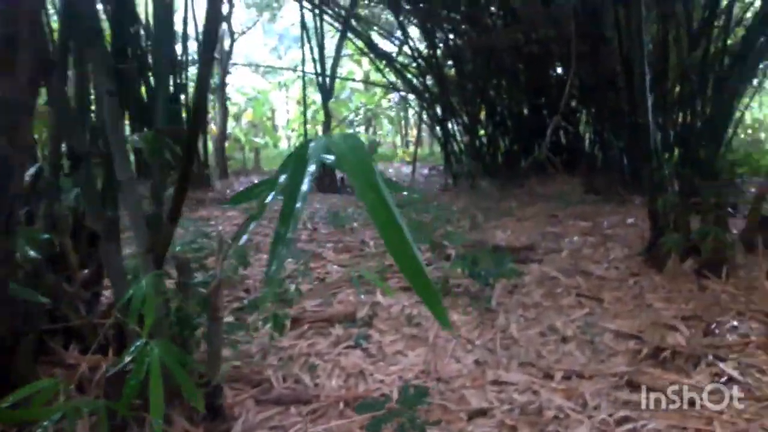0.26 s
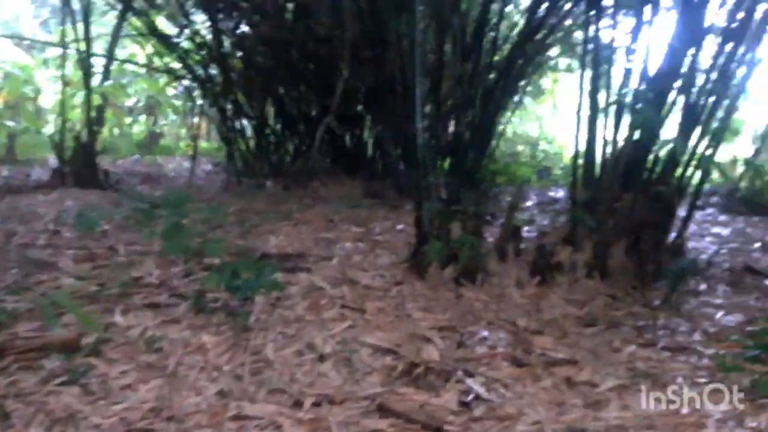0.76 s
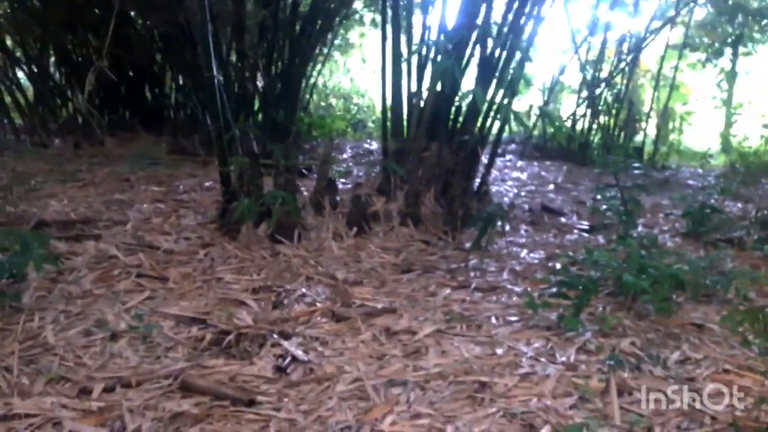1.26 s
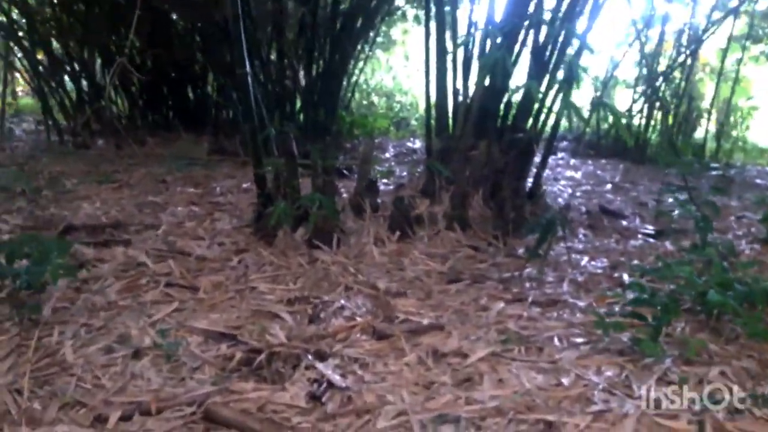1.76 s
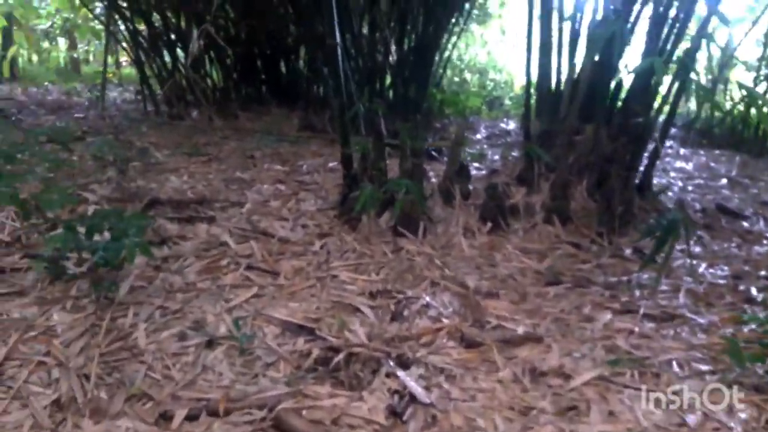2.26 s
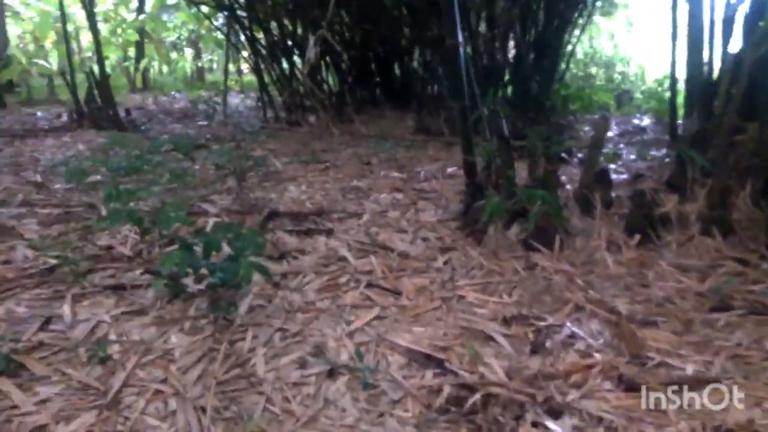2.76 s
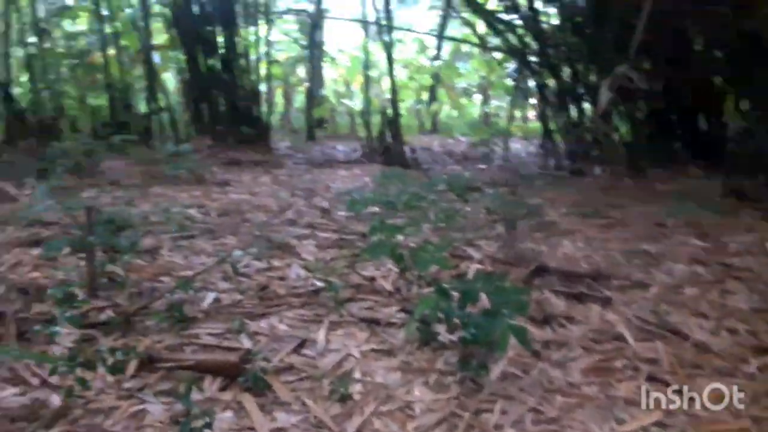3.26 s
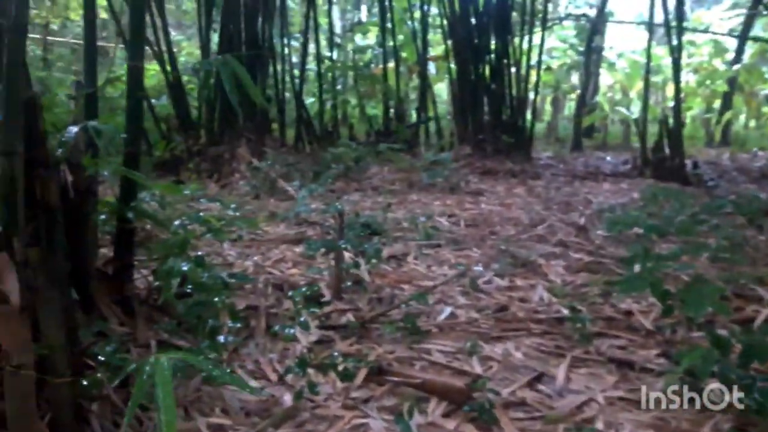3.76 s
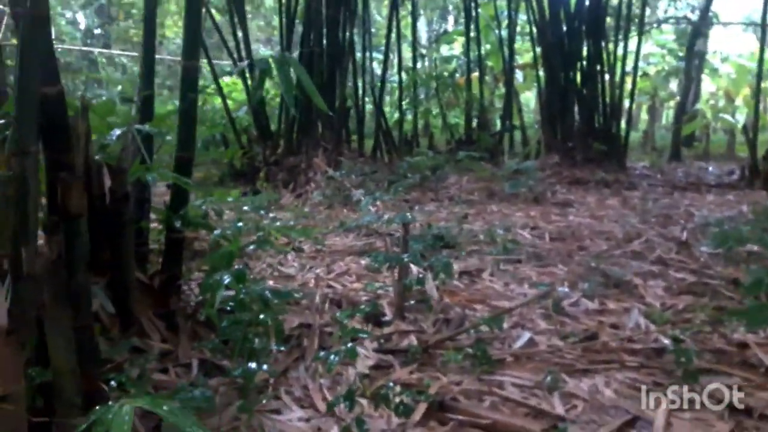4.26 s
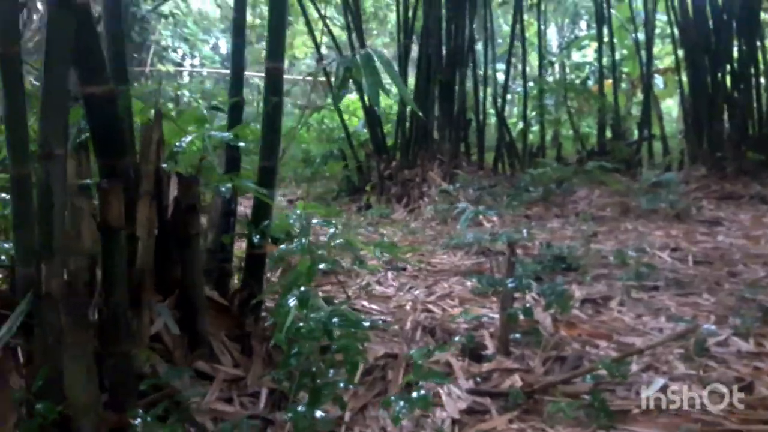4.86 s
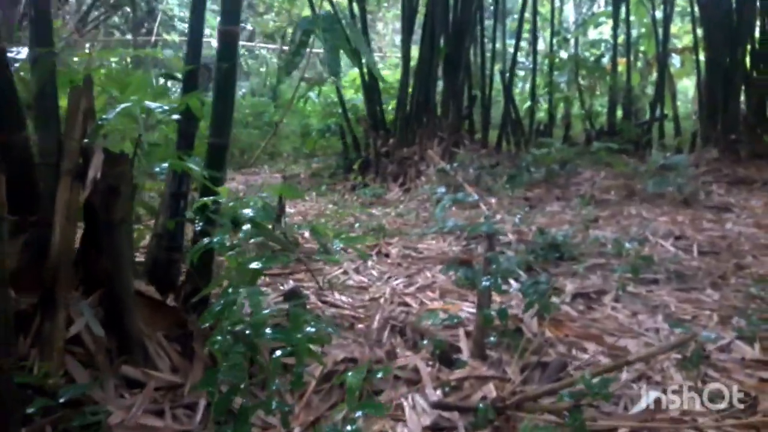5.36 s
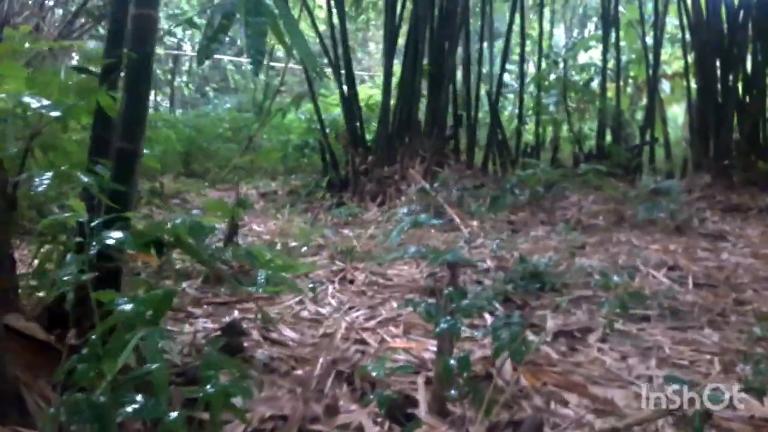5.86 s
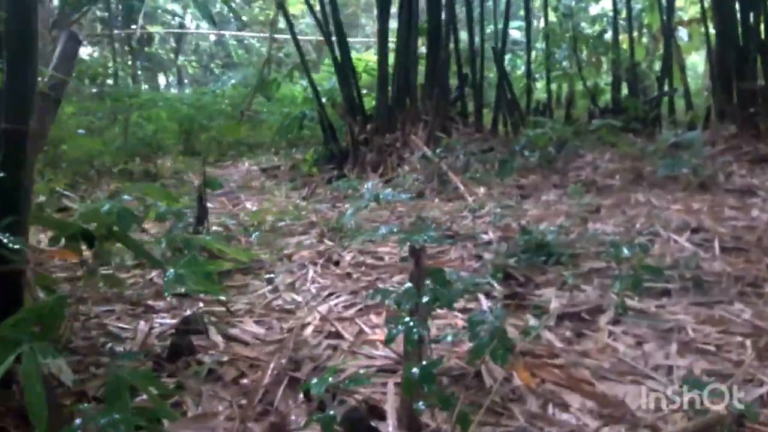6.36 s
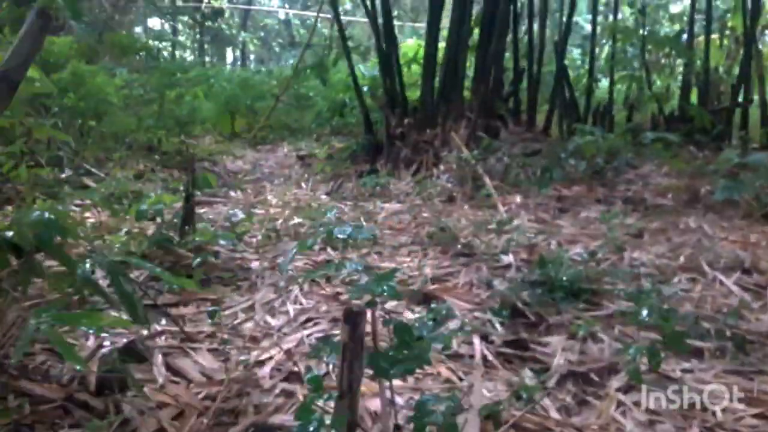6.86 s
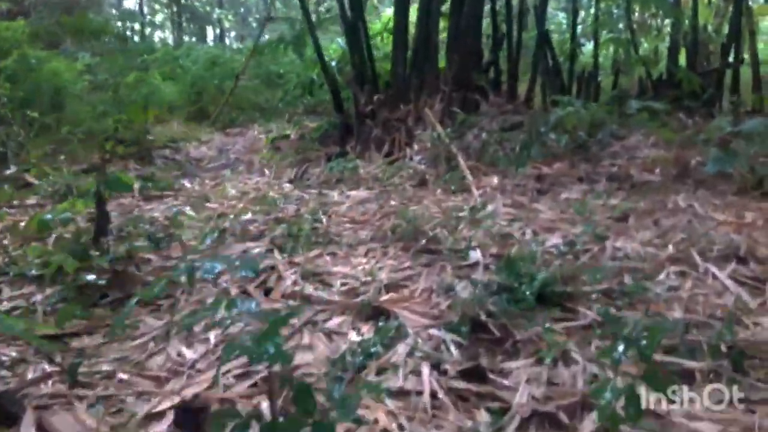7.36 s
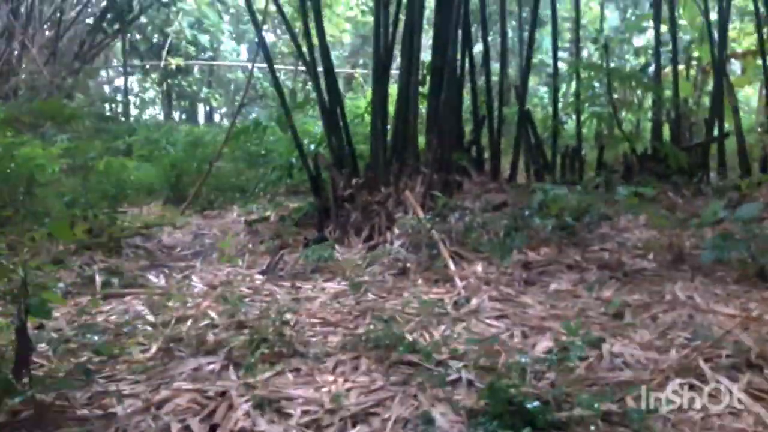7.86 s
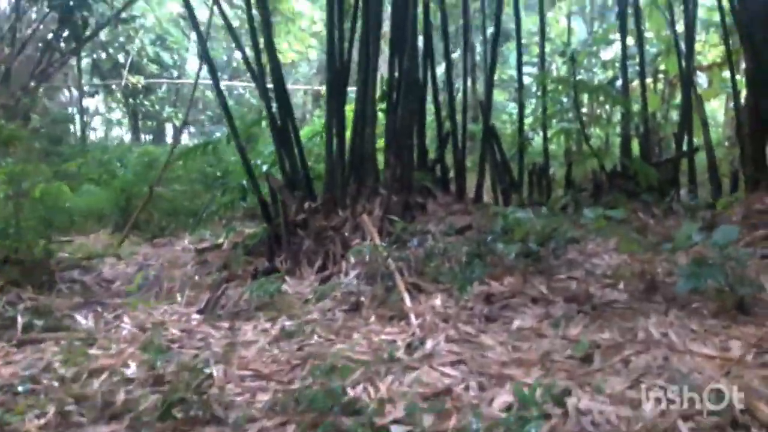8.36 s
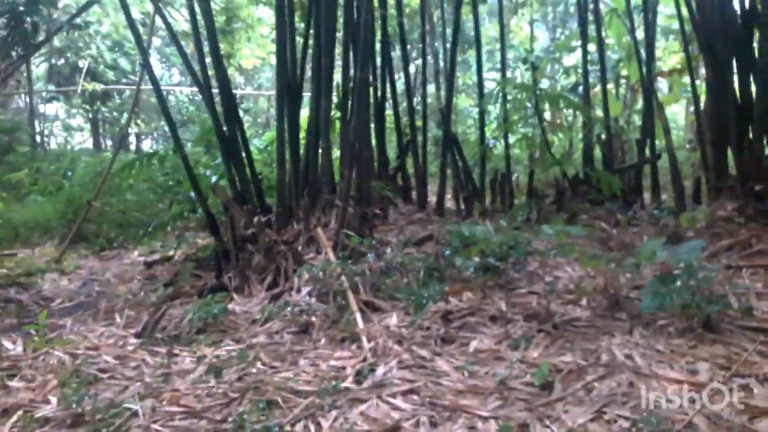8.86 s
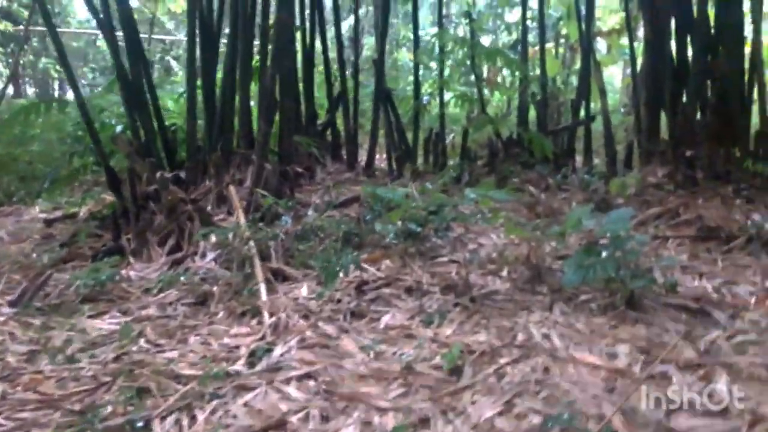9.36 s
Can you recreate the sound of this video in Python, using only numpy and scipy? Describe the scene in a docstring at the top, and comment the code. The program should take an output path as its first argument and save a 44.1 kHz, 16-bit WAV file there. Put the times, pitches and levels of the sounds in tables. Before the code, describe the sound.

Steady rain in a bamboo grove: an even, soft wash of distant drops, faint hollow hums low within it, and fine nearby patter on leaves and dry litter. Bigger canopy drips snap close by at irregular moments. Everything repeats about half a second later at full strength, then ever fainter. One small microphone, centred mono, slightly dull at the very top.

```python
"""A bamboo grove in steady rain, heard by one small microphone.
Far rain is an even wash of smooth noise. Nearer drops patter on leaves and litter as short noisy splashes.
Bigger drips from the canopy splat close by, each a quick burst of noise in its own band.
A half-second delay line repeats everything once at full strength, then ever fainter."""
import sys
import numpy as np
from scipy import signal
from scipy.fft import rfft, irfft
from scipy.io import wavfile

SR = 44100
rng = np.random.default_rng(int(sys.argv[2]) if len(sys.argv) > 2 else 0)


def master_out(mix):
    """Clip the mix to full scale and print it as 16-bit PCM to the path in sys.argv[1]."""
    frames = np.transpose(np.atleast_2d(mix))
    ceiling = np.clip(frames, -1, 1)
    pcm = np.round(ceiling * 32767).astype(np.int16)
    wavfile.write(sys.argv[1], SR, pcm)


N = 423360   # samples heard
DELAY, FEEDBACK = 22056, 0.4   # samples, share sent round again
LEAD = 4 * DELAY   # samples of rain before 0 s, to fill the delay line
LENGTH = N + LEAD


def from_db(db):
    """Turns decibels into a plain multiplier."""
    return 10 ** (np.asarray(db) / 20)


def rms_one(x):
    """Scales a sound to an average (rms) level of 1."""
    return x / np.sqrt(np.mean(x ** 2) + 1e-20)


def colour(x, spectrum):
    """Makes each pitch region louder or softer by a (frequency, level) table; rms 1."""
    hz = np.maximum(np.arange(LENGTH // 2 + 1) * SR / LENGTH, 1)
    table_hz, table_db = np.transpose(spectrum)
    gain_db = np.interp(np.log(hz), np.log(table_hz), table_db)
    return rms_one(irfft(rfft(x) * from_db(gain_db), LENGTH))


def drift(rate_hz):
    """A randomly wandering curve with spread 1: noise smoothed so that little faster than rate_hz is left."""
    r = np.exp(-2 * np.pi * rate_hz / SR)
    return rms_one(signal.lfilter([1], [1, -2 * r, r * r], rng.standard_normal(LENGTH)))


def resonate(x, hz, cycles):
    """A leaf, once struck, rings at hz and fades by 60 dB in so many cycles."""
    r = from_db(-60 * hz / (cycles * SR))
    return signal.lfilter([1, 0, -1], [1, -2 * r * np.cos(2 * np.pi * hz / SR), r * r], x)


HUM_WAVER_DB, HUM_WAVER_HZ = 2.0, 0.92
SHIMMER_ABOVE_HZ, SHIMMER_DB, SHIMMER_RATE_HZ = 7950, 4, 60
# balance of the far rain: (frequency [Hz], level per Hz [dB])
WASH_SPECTRUM = [(25, -38), (45, -31), (110, -18), (200, -10), (290, -4), (550, -1), (850, -3.5),
                 (2200, -7), (3170, -12), (5900, -10.5), (6550, -11.5), (7800, -23), (9800, -29.5),
                 (15500, -26)]
# soft hums in the low wash, probably hollow stems: (frequency [Hz], width [Hz], average lift [dB])
STEM_HUMS = [(131.6, 15, 3), (275, 32, 3.5), (418, 15.4, 4.5), (514, 17, 4), (647, 54, 1.5), (970, 55, 1),
             (1343, 91, 2.5)]


def wash(level_db):
    """Countless far drops merge into smooth noise, lifted a little at each slowly wavering hum."""
    noise = colour(rng.standard_normal(LENGTH), WASH_SPECTRUM)
    hums = 0
    for hz, width_hz, db in STEM_HUMS:
        b, a = signal.iirpeak(hz, hz / width_hz, fs=SR)
        lift = from_db(db + HUM_WAVER_DB * drift(HUM_WAVER_HZ)) - 1   # the part added to the noise
        hums = hums + lift * signal.lfilter(b, a, noise)
    # the finest hiss swells and sinks quickly
    high_pass = signal.butter(2, SHIMMER_ABOVE_HZ, "high", fs=SR, output="sos")
    hiss = signal.sosfilt(high_pass, noise)
    shimmer = (from_db(SHIMMER_DB * drift(SHIMMER_RATE_HZ)) - 1) * hiss
    return from_db(level_db) * (noise + hums + shimmer)


DROPS_PER_S = 600   # before clumping
CLUMPING_DB, CLUMPING_HZ = 4, 15   # how strongly and how fast the crowding of drops varies
SIZE_SPREAD_DB = 3.5
LEAF_CYCLES, SPLASH_MS = 2, 1
SPRAY_SHARE = 0.39   # the rest rings in leaves
# near drops as the microphone colours them: (frequency [Hz], level per Hz [dB])
PATTER_SPECTRUM = [(600, -29), (1300, -12), (2200, 5), (3200, -3.5), (5900, 3), (6600, -1.5), (7800, -8),
                   (9800, -13.5), (15500, -23.5)]


def patter(level_db):
    """Random drops in clumps: each a short splash of noise, partly broad spray, partly ringing in a leaf."""
    chance = DROPS_PER_S * from_db(CLUMPING_DB * drift(CLUMPING_HZ)) / SR
    born = rng.random(LENGTH) < chance
    sizes = born * from_db(SIZE_SPREAD_DB * np.minimum(rng.exponential(1, LENGTH), 2.5))
    fade = np.exp(-1000 / (SPLASH_MS * SR))
    leaves_hz = np.geomspace(1400, 14000, 14)
    leaf_hit = rng.integers(0, 14, LENGTH)
    noise = rng.standard_normal(LENGTH)
    rings, spray = 0, 0
    for k, hz in enumerate(leaves_hz):
        swell = signal.lfilter([1], [1, -fade], sizes * (leaf_hit == k) + 1e-18)
        splash = noise * swell
        ring = resonate(splash, hz, LEAF_CYCLES)
        rings = rings + np.sqrt(hz) * rms_one(ring)   # wider rings carry more power: a flat sum
        spray = spray + splash
    drops = SPRAY_SHARE * rms_one(spray) + (1 - SPRAY_SHARE) * rms_one(rings)
    return from_db(level_db) * colour(drops, PATTER_SPECTRUM)


# limits for the smaller drips: peak [dB], centre [Hz], splash length setting [ms], fine spray [dB]
SMALL_DRIPS_PER_S = 14
SMALL_DB, SMALL_HZ, SMALL_MS, SMALL_SPRAY_DB = (-32, -25), (2700, 6400), (0.87, 3.2), (-61, -38)


def small_drips():
    """Smaller drips fall at random moments over the whole span, with random settings between the limits."""
    span = (-LEAD / SR, N / SR)
    low, high = np.transpose([span, SMALL_DB, SMALL_HZ, SMALL_MS, SMALL_SPRAY_DB])
    count = int(SMALL_DRIPS_PER_S * LENGTH / SR)
    return low + (high - low) * rng.random((count, 5))


# a drip's half-width: octaves at 4 kHz, octaves lost per octave up,
# octaves gained per ms that the length setting exceeds a short tap [ms]
WIDTH_OCT, NARROWING, SPREAD_PER_MS, TAP_MS = 0.24, 0.12, 0.18, 3.3
RISE_MS, TAIL_MS, SPRAY_MS = 0.083, 7.2, 3.6   # time constants
TAIL_DB, SLAP_DB = -10.5, -6.5   # beside the splash, beside the leaf's band
PORT_ROLL_OFF_HZ = 7360
DRIP_SAMPLES, SETTLE = 1024, 256   # kept, and thrown away first while the filters settle
# the loudest drips close by, those before 0 s heard only as repeats:
# (time [s], peak level [dB], centre [Hz], splash length setting [ms], fine spray level [dB])
LOUD_DRIPS = [(-0.2603, -24, 3490, 2.0, -48), (-0.0213, -21, 5100, 1.0, -55),
              (0.2395, -28.5, 3360, 2.3, -57), (0.595, -21.5, 3200, 6.5, -51),
              (0.7021, -21, 4730, 1.0, -48), (0.84, -14.5, 5030, 0.55, -40), (1.1568, -21, 5540, 0.6, -58),
              (1.3849, -19.5, 5500, 2.4, -54), (1.7469, -22, 4340, 2.2, -58), (2.303, -23, 5940, 1.8, -53),
              (2.6196, -22.5, 2730, 1.9, -47), (2.6953, -20.5, 2400, 2.3, -48),
              (2.7485, -22.5, 4230, 2.3, -53), (2.8403, -19.5, 5900, 1.4, -45),
              (2.8617, -33, 5830, 0.9, -36), (2.952, -21, 4260, 1.7, -52), (3.081, -21.5, 5000, 5.1, -41),
              (3.1809, -23, 4840, 1.7, -49), (3.4916, -24.5, 4670, 4.3, -38), (3.6335, -25, 4630, 3.3, -46),
              (3.799, -25.5, 5630, 2.7, -38), (3.9026, -22, 6450, 1.4, -54),
              (4.0417, -18.5, 4540, 2.2, -39), (4.1606, -18.5, 2560, 4.2, -46),
              (4.2577, -23, 4760, 2.3, -47), (4.4217, -22, 6340, 0.69, -42), (4.5136, -19, 5780, 2.2, -55),
              (4.8114, -23, 2700, 0.83, -54), (5.1191, -25, 5390, 1.8, -46), (5.1714, -22, 5550, 1.2, -50),
              (5.3483, -18, 5520, 1.4, -47), (5.6088, -19.5, 5490, 1.4, -47),
              (5.6258, -19.5, 3540, 1.7, -47), (5.7061, -23, 2160, 1.9, -51), (5.7179, -22, 5600, 2.3, -43),
              (6.0934, -24, 4860, 2.5, -31), (6.3613, -19, 4540, 2.3, -34), (6.3826, -20, 4040, 1.7, -46),
              (6.485, -14, 5880, 1.0, -47), (6.8459, -21.6, 6050, 0.9, -48), (6.872, -23, 4170, 0.9, -50),
              (7.0143, -17.5, 2460, 2.9, -46), (7.1418, -19, 6040, 0.7, -40), (7.1474, -24, 4610, 2.6, -45),
              (7.3498, -22, 4010, 1.6, -55), (7.3633, -16, 5620, 0.49, -43),
              (7.4127, -22.5, 3610, 1.4, -46), (7.4482, -20, 5120, 1.2, -58), (7.4688, -16, 6060, 0.6, -40),
              (7.4964, -13.5, 5030, 0.91, -40), (7.7256, -21, 5340, 1.6, -47),
              (7.7319, -19.5, 5680, 1.6, -46), (7.9745, -20, 5010, 1.8, -55), (8.1055, -21, 3530, 0.8, -55),
              (8.422, -23.5, 4500, 3.4, -58), (8.558, -24, 4820, 0.6, -39), (8.627, -17, 4800, 0.9, -58),
              (8.971, -15.5, 4500, 1.2, -58), (8.9746, -19, 4620, 0.97, -53),
              (9.078, -22.5, 2910, 1.1, -58), (9.3192, -23, 5190, 2.6, -38), (9.376, -22, 5060, 0.9, -43)]


def drips():
    """Each drip is a burst in the band its leaf favours over a broad slap, with a faint tail and a fine spray."""
    body, mist = np.zeros(LENGTH + DRIP_SAMPLES), np.zeros(LENGTH + DRIP_SAMPLES)
    t_ms = np.arange(DRIP_SAMPLES) * 1000 / SR
    rows = np.vstack([LOUD_DRIPS, small_drips()])
    noise = rng.standard_normal((len(rows), 2, DRIP_SAMPLES + SETTLE))
    fine = signal.butter(4, 8500, "high", fs=SR, output="sos")
    broad = signal.butter(3, [1600, 7000], "band", fs=SR, output="sos")
    rise = 1 - np.exp(-t_ms / RISE_MS)
    for (s, peak_db, hz, ms, spray_db), (first, second) in zip(rows, noise):
        octaves = WIDTH_OCT - NARROWING * np.log2(hz / 4000) + SPREAD_PER_MS * max(ms - TAP_MS, 0)
        reach = 2 ** np.clip(octaves, 0.05, 0.7)
        leaf = signal.butter(2, [hz / reach, hz * reach], "band", fs=SR, output="sos")
        splash = np.exp(-(t_ms / (0.75 * max(ms, 0.3))) ** 0.95)
        tail = from_db(TAIL_DB) * np.exp(-t_ms / TAIL_MS)
        burst = rise * (splash + tail)
        slap = from_db(SLAP_DB) * rms_one(signal.sosfilt(broad, second))
        tone = rms_one(signal.sosfilt(leaf, first)) + slap
        drip = tone[SETTLE:] * burst
        # give it the energy of a sine under the same swell
        drip *= np.sqrt(np.sum(burst ** 2) / np.sum(drip ** 2) / 2)
        spray = rms_one(signal.sosfilt(fine, second))[SETTLE:] * rise * np.exp(-t_ms / SPRAY_MS)
        at = round(s * SR) + LEAD
        body[at:at + DRIP_SAMPLES] += from_db(peak_db) * drip
        mist[at:at + DRIP_SAMPLES] += from_db(spray_db) * spray
    # the microphone port drops steeply at the top; the spray is added after it
    port = signal.butter(5, PORT_ROLL_OFF_HZ, fs=SR, output="sos")
    return (signal.sosfilt(port, body) + mist)[:LENGTH]


def delay_line(x):
    """Adds one full repeat after DELAY samples; each further repeat is FEEDBACK times the last."""
    repeats = np.zeros(LENGTH)
    for i in range(DELAY, LENGTH, DELAY):
        block = x[i - DELAY:i] + FEEDBACK * repeats[i - DELAY:i]
        repeats[i:i + DELAY] = block[:LENGTH - i]
    return x + repeats


# how strong the rain is: (time [s], far wash level [dB], near patter level [dB])
RAIN_LEVELS = [(0, -35.5, -46), (1.2, -35.5, -42.5), (2.4, -34.5, -42), (3.6, -35.5, -41),
               (4.8, -35.5, -41.5), (6, -35, -43), (7.2, -35, -42), (8.4, -34.5, -42.5), (9.6, -34, -43.5)]


def scene():
    """The rain and its repeats; one microphone feeds both channels."""
    s, wash_db, patter_db = np.transpose(RAIN_LEVELS)
    t = (np.arange(LENGTH) - LEAD) / SR
    far = wash(np.interp(t, s, wash_db))
    near = patter(np.interp(t, s, patter_db))
    rain = far + near + drips()
    heard = delay_line(rain)[LEAD:]
    return np.array([heard] * 2)


CUTOFF_HZ = 15720
OFFSET = -0.0017   # of full scale


def record(dry):
    """A steep filter cuts the top, and a small steady offset is added."""
    low_pass = signal.ellip(14, 0.5, 75, CUTOFF_HZ, fs=SR, output="sos")
    return signal.sosfilt(low_pass, dry) + OFFSET


dry = scene()
out = record(dry)
master_out(out)
```